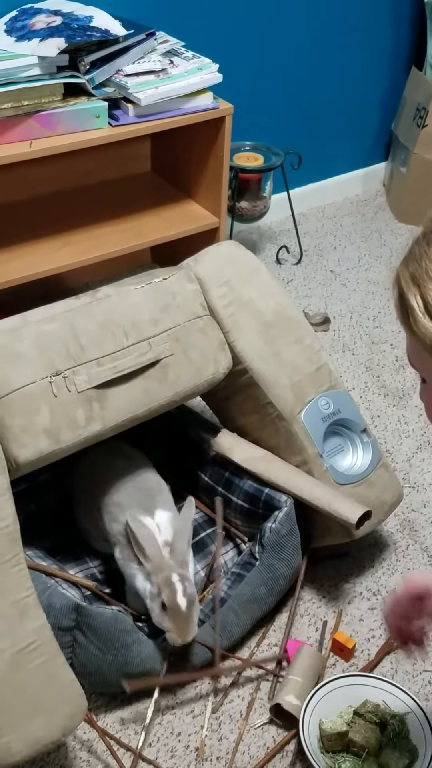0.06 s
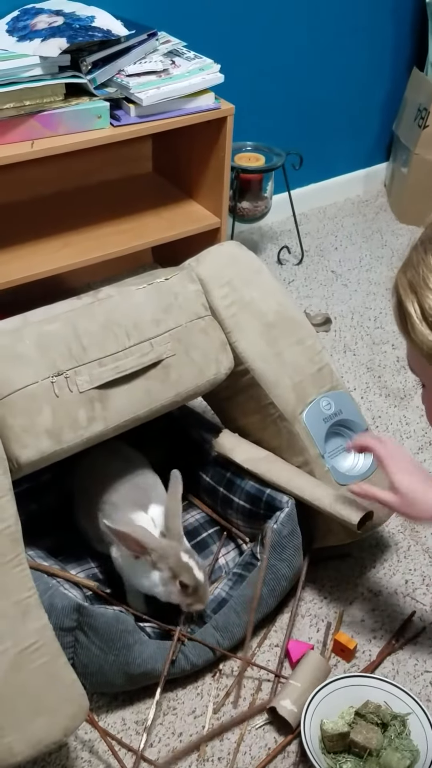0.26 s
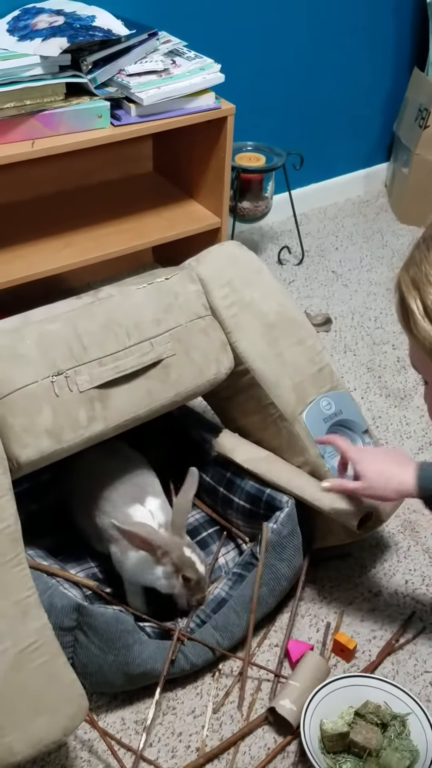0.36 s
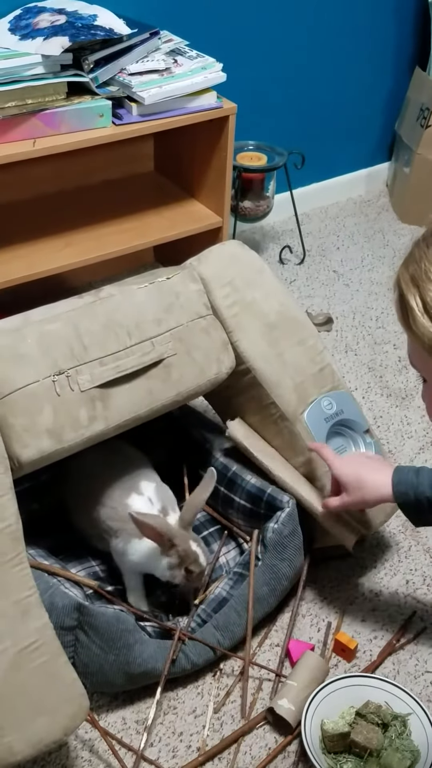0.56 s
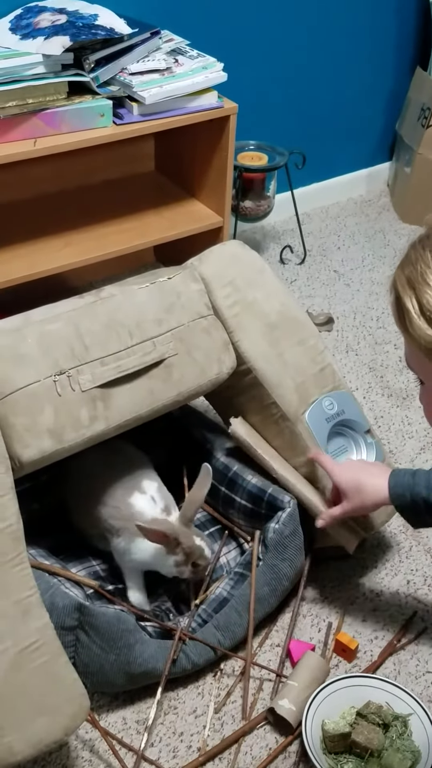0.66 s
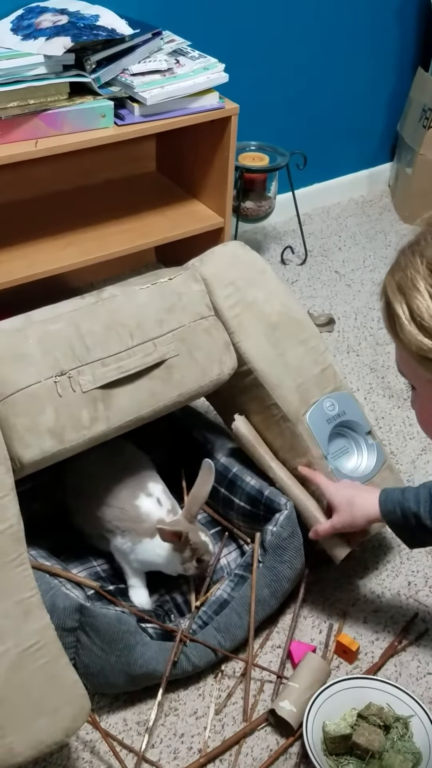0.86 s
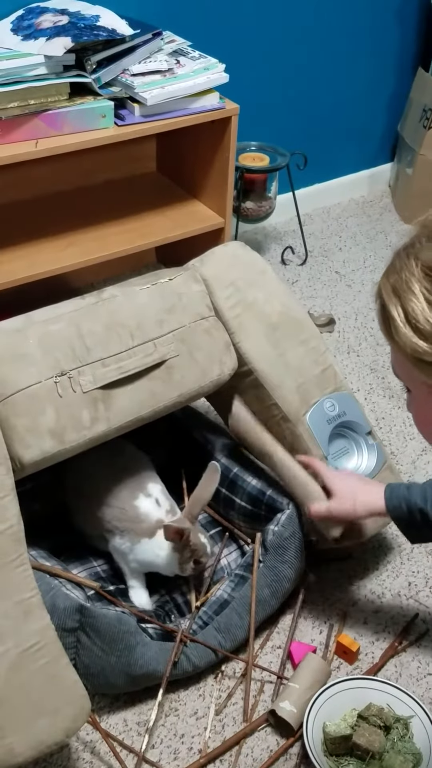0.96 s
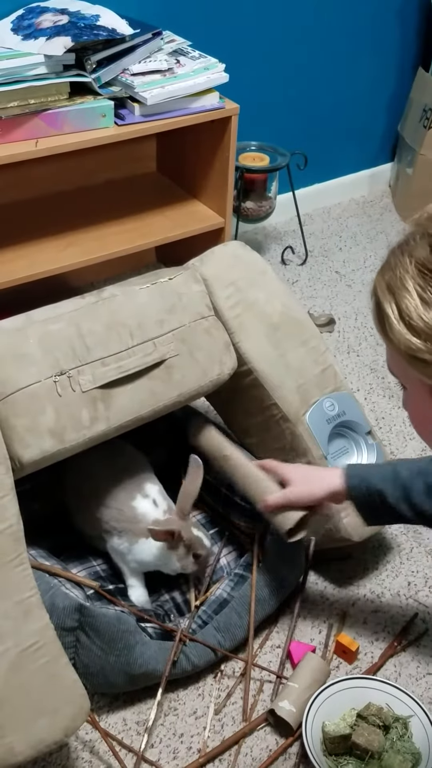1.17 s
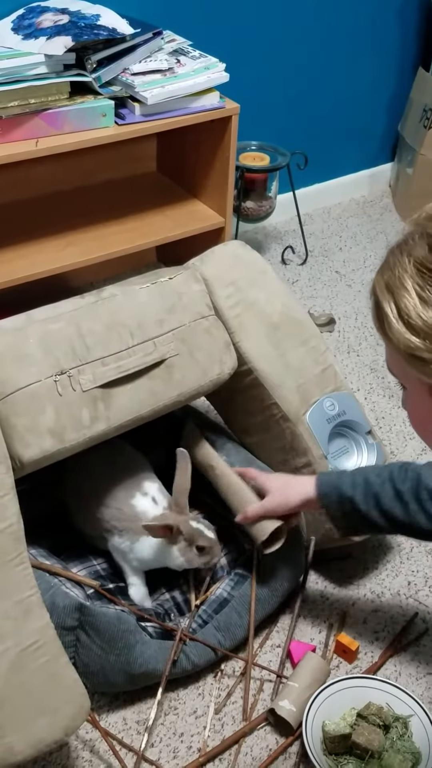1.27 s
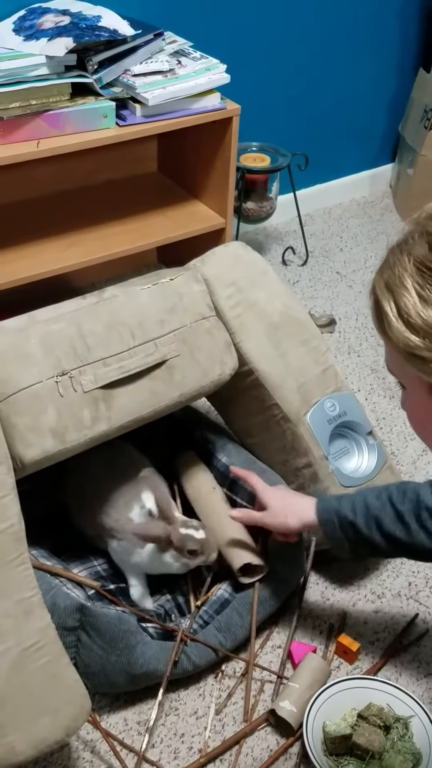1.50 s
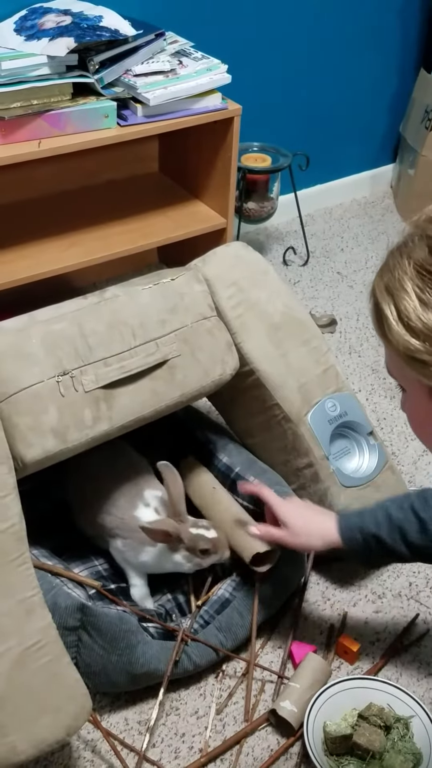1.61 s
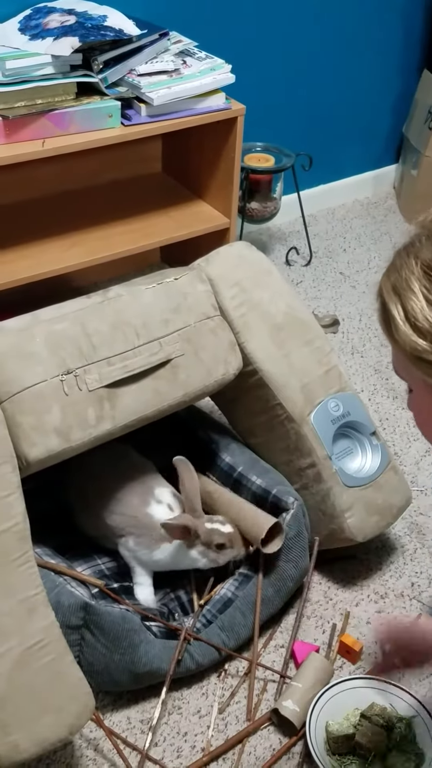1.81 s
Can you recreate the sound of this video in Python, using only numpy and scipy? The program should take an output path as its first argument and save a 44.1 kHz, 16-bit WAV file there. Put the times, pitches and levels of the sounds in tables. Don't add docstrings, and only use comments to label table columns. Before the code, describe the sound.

A dry stick tossed by a rabbit clacks at once, then rattles between 0.1 and 0.6 s over soft paw thuds and cushion rustle. A cardboard tube is gripped near 0.56 s, scrapes lightly until 1.1 s, and after a lull knocks hollowly from 1.42 to 1.84 s. Finger pops hit the left microphone at 0.25 and 0.9 s, the second followed by a brief low rub. Quiet carpeted room, faint hush.

```python
import sys
import numpy as np
from scipy import signal
from scipy.fft import rfft, irfft, next_fast_len
from scipy.io import wavfile

SR = 44100
rng = np.random.default_rng(int(sys.argv[2]) if len(sys.argv) > 2 else 0)


def linear_from_db(decibels):
    return 10 ** (np.asarray(decibels, float) / 20)


def store_pcm(level_fs):
    pcm = np.round(np.clip(level_fs, -1, 1) * 32767).astype(np.int16)
    wavfile.write(sys.argv[1], SR, np.atleast_2d(pcm).T)


N = 81585

# [f/Hz, level/dB]
AIR_COLOUR = [(30, -12), (80, -4), (200, -12.5), (420, -2.5), (1300, -6), (3000, -9.5), (7200, -21.5),
              (13000, -16.5), (16000, -29)]
# [f/Hz, correlation -1 to 1]
PORT_LIKENESS = [(60, 0.91), (240, 1), (950, 0.1), (3770, -0.17), (15000, 0.1)]
# [f/Hz, left minus right level/dB]
PORT_LEAN = [(60, -6), (380, -2), (2380, 0), (15000, -4.5)]
# [t/s, level/dB]
WEIGHT_LEVEL = [(0, -59.5), (.05, -68), (.15, -63), (.36, -64.5), (.42, -66), (.47, -56), (.55, -65.5),
                (.64, -59.5), (.8, -65), (.88, -74), (1.0, -70.5), (1.3, -86), (1.5, -68), (1.6, -73.5),
                (1.7, -74.5), (1.8, -70), (1.85, -66)]
# [f/Hz, level/dB]
WEIGHT_COLOUR = [(15, -47), (25, -17.5), (166, -3.5), (281, -7), (365, -4), (500, -5), (650, -27),
                 (1100, -120)]
# [start t/s, length t/s, drag level/dB, fine hiss level/dB, rising share 0-1]
FABRIC_STROKES = [(-.02, 0.12, -55.5, -60, 0), (0.101, 0.17, -58.5, -57, 0.16),
                  (0.229, 0.2, -59, -56.5, 0.51), (0.442, 0.1, -62, -65.5, 0.11),
                  (0.507, .035, -51.5, -67, 0.2), (0.519, .11, -47.5, -53, 0.26),
                  (0.609, 0.094, -63.5, -66.5, 0.5), (0.745, 0.05, -56.5, -72, 0.05),
                  (0.76, 0.18, -59.5, -60, 0.59), (0.937, 0.11, -57.5, -56.5, 0.41),
                  (1.023, 0.078, -54, -62.5, 0.49), (1.067, 0.13, -67, -88, 0.3),
                  (1.32, 0.22, -67, -62.5, 0.51), (1.412, 0.15, -52, -76, 0),
                  (1.537, 0.088, -53.5, -62, 0.17), (1.582, 0.096, -53.5, -56.5, 0.46),
                  (1.67, 0.079, -51, -89, .15), (1.711, 0.098, -70, -93, 0.3),
                  (1.802, 0.067, -66, -75, 0.2)]
# [f/Hz, level/dB]
DRAG_COLOUR = [(150, -74), (250, -37), (299, -17.5), (1140, -4.5), (1340, -39.5), (1760, -2), (9000, -42.5),
               (11700, 10), (19800, -120)]
# [f/Hz, level/dB]
CLOTH_COLOUR = [(3000, 6), (4500, -1.5), (7200, -2), (9500, -4), (13000, 1), (16000, -5.5)]
# [t/s, peak level/dB]
EDGE_TICKS = [(0.122, -54), (0.2415, -43.5), (0.2732, -42.5), (0.191, -50), (0.2085, -52), (0.3114, -42.5),
              (0.3574, -53.5), (0.508, -50.5), (0.7454, -58.5), (1.417, -59), (1.541, -52.5), (1.55, -49),
              (1.8104, -57.5)]
# [t/s, level/dB, favoured f/Hz, chatter t/s]
PAW_HITS = [(.17, -58, 109, 0.0077), (.16, -43, 334, 0.016), (.215, -47, 335, .004),
            (.33, -56, 84.5, 0.015), (.449, -47, 154, 0.017), (.455, -45.5, 380, .006),
            (.478, -50, 170, 0.0059), (.515, -48.5, 222, 0.013), (.525, -47, 374, .008),
            (.592, -53, 96, 0.0044), (.645, -60, 403, 0.018), (.705, -60, 406, .02),
            (1.69, -55, 76.5, 0.0069)]
# [f/Hz, level/dB, t60/s]
CUSHION_MODES = [(88, -2, .06), (165, -1, .08), (228, -3, .08), (400, -5, .08)]
# [t/s, level/dB, favoured f/Hz, chatter t/s]
STICK_HITS = [(.001, -36, 3500, 0.015), (.001, -45.5, 4840, 0.025), (.002, -59, 6900, .005),
              (.001, -51, 1610, 0.045), (.022, -49, 4940, 0.011), (.108, -43, 3000, .006),
              (.121, -40.5, 900, 0.0022), (.125, -45, 1220, 0.0047), (.135, -46.5, 1210, 0.0037),
              (.155, -49, 1070, 0.0088), (.19, -52.5, 1150, 0.0036), (.2745, -44.5, 990, 0.0051),
              (.281, -48, 1150, 0.0025), (.295, -55, 1210, 0.015), (.311, -43, 1000, 0.0014),
              (.325, -52, 1200, 0.0091), (.357, -49.5, 1200, .003), (.37, -55, 1220, 0.022),
              (.45, -52, 1300, .008), (.451, -48.5, 760, .004), (.5095, -47, 1360, 0.0045),
              (.51, -55, 2300, .003), (.525, -52.5, 910, 0.014), (.538, -57, 3400, .004),
              (.545, -53, 2050, .004), (.55, -48.5, 920, .008), (.566, -48, 3000, 0.0036)]
# [f/Hz, level/dB, t60/s]
STICK_MODES = [(860, 2, .025), (975, -2, .035), (1171, 2, .045), (1238, 1, .05), (1496, 2, .03),
               (2090, -12, .015), (2980, -3, .018), (4690, 2, .022), (5010, 1, .018)]
# [t/s, level/dB, favoured f/Hz, chatter t/s]
TUBE_HITS = [(.558, -44.5, 1340, 0.012), (.565, -42.5, 1330, 0.003), (.583, -63, 1300, 0.0082),
             (.652, -55.5, 1240, 0.0097), (.66, -49, 940, 0.023), (.746, -47.5, 833, .0025),
             (.748, -48, 1380, 0.0066), (.752, -55, 527, 0.0027), (.97, -47, 2860, 0.011),
             (.995, -52, 1240, 0.013), (1.054, -43, 2670, 0.0057), (1.056, -57, 2950, .003),
             (1.06, -67, 804, 0.0053), (1.073, -53, 830, 0.0044), (1.4187, -32, 1440, 0.00092),
             (1.429, -44, 1400, 0.0023), (1.419, -40.5, 587, 0.0017), (1.431, -41.5, 584, 0.011),
             (1.448, -63, 1310, 0.044), (1.455, -67, 920, 0.027), (1.493, -46, 1430, 0.002),
             (1.5405, -42.5, 1460, 0.0084), (1.541, -39, 748, 0.015), (1.5405, -73, 5300, .002),
             (1.49, -56, 536, 0.023), (1.545, -49, 367, 0.026), (1.552, -41.5, 1380, 0.01),
             (1.556, -39.5, 770, 0.0041), (1.577, -55.5, 770, 0.0072), (1.592, -45.5, 760, 0.0055),
             (1.43, -57, 209, 0.034), (1.628, -52.5, 1370, 0.011), (1.63, -52, 726, 0.011),
             (1.677, -57, 1980, .002), (1.684, -44.5, 432, 0.0055), (1.70, -54.5, 383, 0.025),
             (1.811, -54.5, 1410, 0.0054), (1.813, -52.5, 615, .004), (1.819, -47.5, 750, 0.0036),
             (1.827, -45.5, 630, 0.0062), (1.84, -80, 645, 0.0061)]
# [f/Hz, level/dB, t60/s]
TUBE_MODES = [(360, 4, .07), (425, 0, .06), (615, 3, .07), (762, 3, .07), (885, -8, .05), (1232, -5, .05),
              (1341, 2, .055), (1438, -1, .04), (1840, -7, .03), (2440, -10, .02), (2920, -7, .02)]
# [t/s, push amplitude, snap amplitude, leak t/s]
FINGER_POPS = [
    (.24808, .39, .03, 1.0),
    (.90225, .04, .12, .0012),
]
# [t/s, level/dB]
FINGER_RUB = [
    (.93, -73),
    (.96, -63),
    (.99, -57),
    (1.03, -63),
    (1.06, -61.5),
    (1.085, -70),
    (1.11, -95),
]


def rms_one(x):
    return x / np.sqrt(np.mean(x ** 2) + 1e-20)


def gain_curve(rows):
    s, db = np.transpose(rows)
    return linear_from_db(np.interp(np.arange(N) / SR, s, db))


def at_hz(points, hz):
    f, value = np.transpose(points)
    return np.interp(np.log(hz), np.log(f), value)


def filtered(x, order, hz, kind):
    return signal.sosfilt(signal.butter(order, hz, kind, fs=SR, output="sos"), x)


def drift(rate_hz):
    r = np.exp(-80 * np.pi * rate_hz / SR)
    slow = signal.lfilter([1], [1, -2 * r, r * r], rng.standard_normal(N // 40 + 2002))[2000:]
    return np.interp(np.arange(N) / 40, np.arange(len(slow)), rms_one(slow))


def ring(clicks, hz, t60):
    r, w = linear_from_db(-60 / (t60 * SR)), 2 * np.pi * hz / SR
    return signal.lfilter([0, np.sin(w)], [1, -2 * r * np.cos(w), r * r], clicks + 1e-18)


def banded(spectrum, patchy_db, rate_hz, grain_db):
    out = 0
    together = drift(rate_hz)
    edges = 22 * 2 ** np.arange(0, 9.6, .5)
    white = rng.standard_normal((2, 2, N)) * linear_from_db(grain_db * drift(98))
    for k, (low, high) in enumerate(zip(edges, edges[1:])):
        hz = np.sqrt(low * high)
        if spectrum[0][0] * .9 < hz < spectrum[-1][0] * 1.1:
            mid, side = filtered(white[k % 2], 2, [low, high], "band")
            alike = np.clip(at_hz(PORT_LIKENESS, hz), -1, 1)
            flicker_db = patchy_db * (together + 1.5 * drift(rate_hz * 2))
            gain = linear_from_db(at_hz(spectrum, hz) + flicker_db)
            lean = linear_from_db(at_hz(PORT_LEAN, hz) * np.array([[.5], [-.5]]))
            pair = np.sqrt(1 + alike) * mid + np.sqrt(1 - alike) * side * [[1], [-1]]
            out = out + gain * lean * pair
    return rms_one(out)


def air():
    return linear_from_db(-64) * banded(AIR_COLOUR, patchy_db=0.0, rate_hz=24, grain_db=-1.0)


def room(x):
    t60_s, wall_cut_hz = 0.41, 2440
    out, size = np.zeros((2, N)), next_fast_len(N + SR)
    spectrum = rfft(x, size)
    z = np.exp(-2j * np.pi * np.arange(size // 2 + 1) / size)
    dull = np.exp(-2 * np.pi * wall_cut_hz / SR)
    for k, lag in enumerate((rng.uniform(.006, .022, 12) * SR).astype(int)):
        loss = linear_from_db(-60 * lag / SR / t60_s)
        loop = loss * (1 - dull) / (1 - dull * z) * z ** lag
        out[k % 2] += irfft(spectrum * loop / (1 - loop), size)[:N] * (-1) ** (k // 2)
    return out


def rabbit_weight():
    return gain_curve(WEIGHT_LEVEL) * banded(WEIGHT_COLOUR, patchy_db=3.5, rate_hz=36, grain_db=-0.5)


def strokes(column):
    t, power = np.arange(N) / SR, 1e-14
    for row in FABRIC_STROKES:
        start, length, rising = row[0], row[1], row[4]
        u = np.clip((t - start) / length, 0, 1)
        bend = np.log(.5) / np.log(np.clip(rising, .05, .9))
        power = power + linear_from_db(2 * row[column]) * np.sin(np.pi * u ** bend) ** 2
    return np.sqrt(power)


def crackle():
    grains_per_s, cycles = 900, 6.4
    sizes = linear_from_db(2.77 * np.minimum(rng.exponential(1, (2, N)), 4)) * rng.choice([-1, 1], (2, N))
    born = rng.random((2, N)) < grains_per_s / SR
    dealt = rng.integers(0, 14, (2, N))
    rings = 0
    for k, hz in enumerate(np.geomspace(800, 4800, 14)):
        rings = rings + ring(sizes * born * (dealt == k), hz, cycles / hz)
    return linear_from_db(-5) * rms_one(filtered(rings, 2, 600, "high"))


def upholstery_drag():
    rasp = banded(DRAG_COLOUR, patchy_db=2.5, rate_hz=12.2, grain_db=1.5)
    return strokes(column=2) * (rasp + crackle())


def edge_ticks():
    t60_s = .022
    clicks = np.zeros(N)
    s, db = np.transpose(EDGE_TICKS)
    clicks[(s * SR).astype(int)] = linear_from_db(db - 2.5)
    return signal.lfilter([1], [1, -linear_from_db(-60 / (t60_s * SR))], clicks + 1e-18)


def cloth_hiss():
    ticks = edge_ticks() * linear_from_db(np.array([[-4], [1.5]]))
    gain = strokes(column=3) + ticks
    return gain * banded(CLOTH_COLOUR, patchy_db=0.45, rate_hz=53, grain_db=1.5)


def struck(hits, modes):
    chatter_per_s, thud_cycles, reach_octaves, grip_shift = 800, 13.0, .3, .008
    t = np.arange(4000) / SR
    out = np.zeros(N + t.size)
    shape = (len(hits), t.size)
    trains = (rng.random(shape) < chatter_per_s / SR) * rng.normal(0, .38, shape)
    trains[:, 0] = 1
    luck = rng.normal(0, 1.5, (len(hits), len(modes)))
    shifts = 1 + rng.normal(0, grip_shift, luck.shape)
    fade = np.cos(np.pi / 2 * t / t.size * SR) ** .5
    for (s, db, favoured_hz, chatter), train, own, shift in zip(hits, trains, luck, shifts):
        blows = linear_from_db(db - 6) * train * np.exp(-t / max(chatter, 1e-3))
        sound = linear_from_db(-6) * ring(blows, favoured_hz, thud_cycles / favoured_hz)
        for (hz, level_db, t60), luck_db, bend in zip(modes, own, shift):
            near_db = -6 * abs(np.log2(hz / favoured_hz) / reach_octaves) ** 2
            sound += linear_from_db(level_db + near_db + luck_db) * ring(blows, hz * bend, t60)
        sound = filtered(sound, 3, .6 * favoured_hz, "high")
        edge = np.diff(blows, prepend=0)
        crack = sum(ring(edge, hz, .008) for hz in (2100, 2850, 4400))
        sound += linear_from_db(-1) * min(favoured_hz / 1300, 1) * crack
        i = max(int(s * SR), 0)
        out[i:i + t.size] += sound * fade
    return out[:N]


def paws():
    return struck(PAW_HITS, CUSHION_MODES)


def stick():
    return struck(STICK_HITS, STICK_MODES)


def tube():
    return struck(TUBE_HITS, TUBE_MODES)


def at_ports(knocks):
    left_lag_s = 0.00015
    late = np.interp(np.arange(N) - left_lag_s * SR, np.arange(N), knocks)
    direct = np.array([late * linear_from_db(1.2), knocks * linear_from_db(2.0)])
    return direct + linear_from_db(-10) * room(knocks)


def finger_pops():
    slip_s, creep_s = .00011, .0009
    t, pressure, snaps = np.arange(N) / SR, np.zeros(N), np.zeros(N)
    for s, push, snap, leak in FINGER_POPS:
        near = np.exp(-abs(t - s) / slip_s)
        slow = np.exp(-abs(t - s) / np.where(t < s, creep_s, leak))
        pressure += np.where(t < s, -snap * (near + .3 * slow), push * slow + snap * near)
        snaps[int(s * SR)] = snap
    soft = filtered(pressure, 2, 3600, "low")
    soft = soft + .45 * ring(np.diff(snaps, prepend=0), 13500, .0005)
    return filtered(soft, 2, 105, "high")


def finger_rub():
    hum_hz = 185 + 4.5 * drift(15)
    hum = rms_one(np.sin(2 * np.pi * np.cumsum(hum_hz) / SR))
    return gain_curve(FINGER_RUB) * linear_from_db(-1.5 * drift(20)) * hum


def finger():
    return np.array([finger_pops() + finger_rub(), np.zeros(N)])


def scene():
    background = air() + rabbit_weight()
    fabric = upholstery_drag() + cloth_hiss()
    knocks = at_ports(paws() + stick() + tube())
    return background + fabric + knocks + finger()


def low_pass(x):
    return signal.sosfilt(signal.butter(12, 16820, fs=SR, output="sos"), x)


def record(dry):
    cutoff_hz, offset = 15800, -.00048
    steep = signal.cheby2(20, 30, cutoff_hz * 1.005, fs=SR, output="sos")
    mix = signal.sosfilt(steep, dry) + offset
    return low_pass(mix)


dry = scene()
out = record(dry)
store_pcm(out)
```